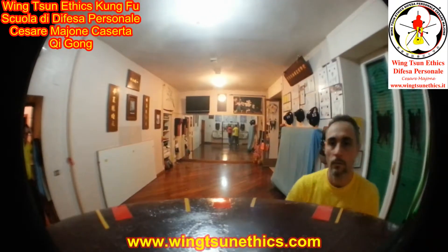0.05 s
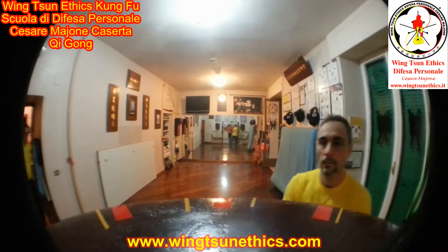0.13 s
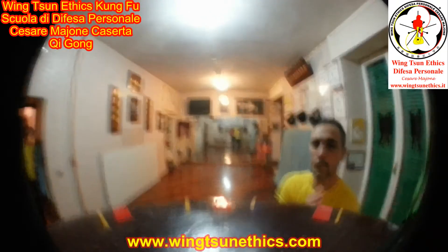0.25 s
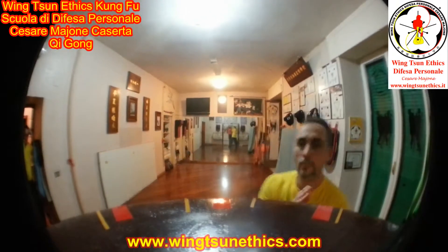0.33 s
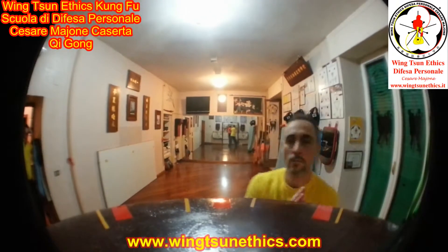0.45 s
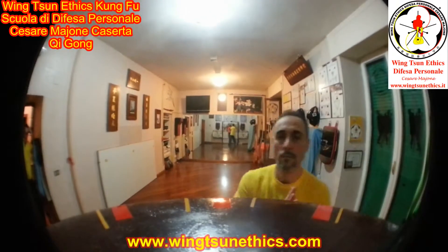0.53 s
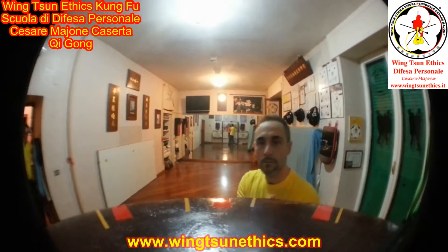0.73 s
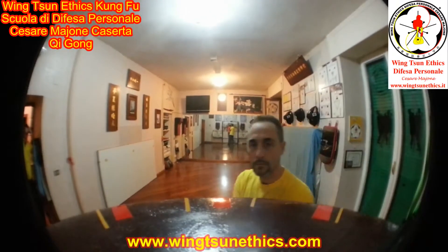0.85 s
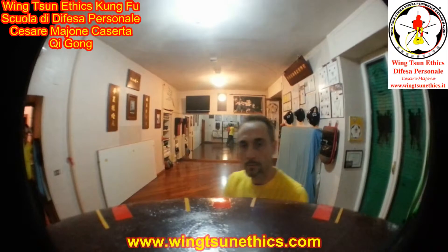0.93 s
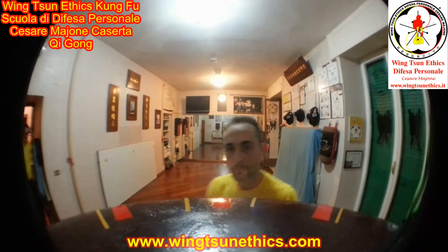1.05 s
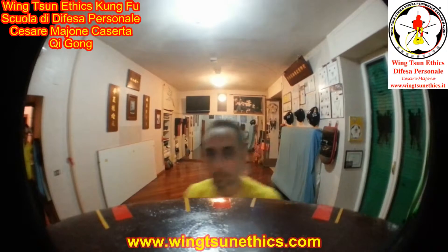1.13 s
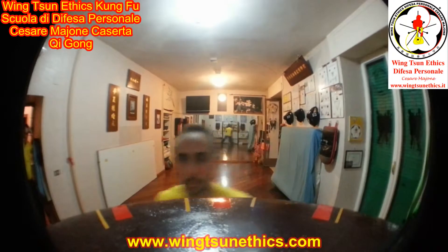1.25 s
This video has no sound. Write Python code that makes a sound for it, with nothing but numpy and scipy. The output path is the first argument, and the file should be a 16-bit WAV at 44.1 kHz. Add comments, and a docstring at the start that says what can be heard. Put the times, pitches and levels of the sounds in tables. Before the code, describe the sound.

The tail of an earlier wooden blow dies away, then one sharp, clipped knock bursts out close by. The hall rings, the loose arm clicks lightly, and shoes scuff quietly near the end; the right side is muffled.

```python
"""Forearm blow on a wooden dummy

A forearm strikes a wooden training dummy close to two microphones, the right one muffled, in a long
hard-walled hall. Damped modes and noise cracks form a tick, the main blow, a burst and a rattle; the blow
overloads the input. Dense echoes answer from the far end and ring on until an expander shuts them.
An earlier blow is dying away at the start. Noise bursts make two shoe scuffs, the far wall's echo of the
second and the clicks of the loose arm; dying sines make low tones that swell briefly, and soft thuds.
Steady coloured noise is the room hush.
"""
import sys
import numpy as np
from scipy import signal
from scipy.fft import rfft, irfft, next_fast_len
from scipy.io import wavfile
from scipy.ndimage import uniform_filter1d

SR = 44100
rng = np.random.default_rng(int(sys.argv[2]) if len(sys.argv) > 2 else 0)


def volts(x):
    """Linear amplitude factor 10**(x/20) for a level x in dB, scalar or array-like."""
    e = np.asarray(x, float) / 20
    return 10 ** e


def to_wav(sig):
    """Store sig (one row per channel, or 1-D mono) as 16-bit WAV at the path in sys.argv[1].

    Samples outside -1..1 are clipped; the rate is SR.
    """
    pcm = np.clip(np.atleast_2d(sig), -1, 1) * 32767
    pcm = np.round(pcm).astype(np.int16)
    wavfile.write(sys.argv[1], SR, pcm.T)  # frames by channels


N = 57330
LEAD_S = 0.7  # computed ahead of time zero, so that the earlier blow is already dying away
SIZE = N + round(LEAD_S * SR)

# contacts with the wood: an earlier blow, then tick, main blow, burst and rattle:
# (time [s], ring level [dB], crack level [dB], crack T60 [s])
WOOD_CONTACTS = [(-.45, 0, 5, 0.024), (.2455, -16.5, -7, 0.0093), (0.2489, 10.5, 0, 0.069),
                 (0.2538, -7, 7, 0.01), (.2735, -15.5, -5.5, 0.025)]
# muffling of the right microphone for hall sound and shoe: (frequency [Hz], left minus right [dB])
HALL_MUFFLING = [(60, 4), (110, -6.5), (200, 6), (380, 2.5), (700, 9), (1290, 12.5), (2380, 26), (4400, 38),
                 (8120, 30.5), (15000, -8)]


def read(points, hz):
    """Interpolates a table linearly along a logarithmic frequency axis."""
    f, value = np.transpose(points)
    return np.interp(np.log(hz + 1), np.log(f + 1), value)


def colour(x, points, sign=1):
    """Minimum-phase filter: folding the cepstrum of a (frequency [Hz], level [dB]) curve makes it causal."""
    size = 2 * next_fast_len(x.shape[-1] // 2 + 4096)
    level_db = sign * read(points, np.fft.rfftfreq(size, 1 / SR))
    cepstrum = irfft(np.log(volts(level_db)), size)
    cepstrum[1:size // 2] *= 2
    cepstrum[size // 2 + 1:] = 0
    response = np.exp(rfft(cepstrum))
    return irfft(rfft(x, size) * response, size)[..., :x.shape[-1]]


def add(mix, s, sound):
    """Superposition: adds a sound to the mix from time s on."""
    part = mix[..., round((s + LEAD_S) * SR):][..., :sound.shape[-1]]
    part += sound[..., :part.shape[-1]]


def dying(t60, rise):
    """Exponential decay after a soft exponential rise, with its time axis; it ends after 0.25 s."""
    t = np.arange(SR // 4) / SR
    return t, (1 - np.exp(-t / max(rise, 1e-5))) * volts(-60 * t / t60)


def puff(points, db, t60, rise):
    """Broadband transient: coloured noise of unit power under a decaying envelope."""
    t, shape = dying(t60, rise)
    noise = colour(rng.standard_normal(len(t)), points)
    return volts(db) * shape * noise / noise.std()


def stereo_gain(left_db, right_db):
    """Level difference between the channels, as a column of two amplitude factors."""
    return volts(np.array([[left_db], [right_db]]))


def muffled(x, points):
    """Spectral shading of one microphone: left unchanged, right filtered by the level difference."""
    return np.array([x, colour(x, points, -1)])


def room_hush():
    """Stationary background: independent coloured noise at each microphone."""
    # spectrum of the hush: (frequency [Hz], relative level [dB])
    hush_spectrum = [(30, -1), (120, -1), (400, -12), (2000, -13.5), (3500, -17.5), (5300, -21.5),
                     (9000, -27.5), (15000, -34)]
    # right-hand muffling, before the factor 0.9: (frequency [Hz], left minus right [dB])
    hush_muffling = [(200, -1.5), (2000, 8.5), (5000, 8.5), (12000, -3.5)]
    level_db = -55.5  # rms level before the muffling
    hush = colour(rng.standard_normal((2, SIZE)), hush_spectrum)
    right = colour(hush[1], hush_muffling, -0.9)
    return volts(level_db) * np.array([hush[0], right]) / hush.std()


def hall(x):
    """Diffuse reverberation: sparse random echoes, each band with its own decay and channel coherence."""
    # likeness of left and right, limited to 0..1: (frequency [Hz], coherence [1])
    hall_coherence = [(60, .7), (200, 1), (640, 0), (1400, 0.24)]
    # reverberation time: (frequency [Hz], T60 [s])
    hall_decay = [(60, 3.3), (140, 1.11), (260, 1.034), (450, 1.39), (660, 1.268), (850, 0.77),
                  (1200, 0.93), (1830, 0.86), (2600, 0.91), (4000, 0.92), (8000, 1.128), (14000, 1.8)]
    near_walls_db = -13  # early echoes relative to the full field
    far_wall_s, build_s = 0.041, 0.012  # arrival of the far end's answer and its build-up
    size = 2 * SR
    signs = rng.choice([-1., 1.], (2, size))
    echoes = signs * (rng.random((2, size)) < 0.15)
    hz, t, bands = signal.stft(echoes, SR, nperseg=512)
    same = np.clip(read(hall_coherence, hz), 0, 1)[:, None]
    right = same * bands[0] + np.sqrt(1 - same ** 2) * bands[1]
    right = right / volts(read(HALL_MUFFLING, hz))[:, None]
    bands = np.array([bands[0], right]) * volts(-60 * t / read(hall_decay, hz)[:, None])
    tail = signal.istft(bands, SR, nperseg=512)[1][:, :size]
    s = np.arange(size) / SR
    build_up = np.clip((s - far_wall_s) / build_s, 0, 1)
    near = volts(near_walls_db)
    tail = tail * (near + (1 - near) * build_up)
    tail = tail / np.linalg.norm(tail[0])  # unit energy on the left
    return signal.fftconvolve(x[None], tail, axes=1)[:, :len(x)]


def low_tone(db, hz, t60, rise, rough):
    """Damped oscillation: a dying sine whose amplitude slow noise makes uneven."""
    t, shape = dying(t60, rise)
    lumps = uniform_filter1d(rng.standard_normal(len(t)), 300)
    uneven = 1 + rough * lumps / lumps.std()
    return -volts(db) * shape * uneven * np.sin(2 * np.pi * hz * t)


def low_tones():
    """Superposed damped oscillations: low tones that swell briefly, and soft thuds."""
    # (time [s], level [dB], frequency [Hz], T60 [s], rise [s])
    tone_events = [(.0, -41.5, 241.8, 0.71, 0.0017), (.072, -29, 234.4, 0.16, 0.0051),
                   (0.0751, -37, 110, .16, 0.018), (.495, -17, 287, 0.16, 0.012),
                   (.525, -23.5, 653.6, 0.17, 0.011), (.6, -35, 640.7, 0.75, 0.013),
                   (.78, -39.5, 70, 0.25, 0.018)]
    tones = np.zeros(SIZE)
    for s, *settings in tone_events:
        add(tones, s, low_tone(*settings, rough=0.3))
    # a smooth onset at the very end
    add(tones, 1.2932, low_tone(db=-31, hz=225, t60=0.2, rise=0.002, rough=0))
    return tones


def shoe_scuffs():
    """Friction noise: coloured bursts for two scuffs, and the far wall's slower-rising echo of the second."""
    # (time [s], level [dB], T60 [s], rise [s])
    scuff_events = [(1.038, -42.5, 0.23, 0.0079), (1.1226, -37, 0.092, 0.0018), (1.16, -37, 0.188, 0.0171)]
    # spectrum of the scuffs: (frequency [Hz], relative level [dB])
    scuff_spectrum = [(200, -52), (1000, -13), (2500, 0), (3800, -4.5), (5200, 1), (8000, -13.5),
                      (11000, -19), (15000, -32)]
    shoe = np.zeros(SIZE)
    for s, db, t60, rise in scuff_events:
        add(shoe, s, puff(scuff_spectrum, db, t60, rise))
    return shoe


def arm_clicks():
    """Small impacts: dry noise bursts as the loose arm settles, panned by level difference."""
    # (time [s], left level [dB], right level [dB])
    click_events = [(.352, -30, -40.5), (.655, -38.5, -60), (.702, -37, -60.5)]
    # spectrum of the clicks: (frequency [Hz], relative level [dB])
    click_spectrum = [(1500, -16), (4000, 7.5), (9000, 0), (14000, -16.5), (16000, -44)]
    clicks = np.zeros((2, SIZE))
    for s, left_db, right_db in click_events:
        click = puff(click_spectrum, db=0, t60=0.038, rise=0.0005)
        add(clicks, s, stereo_gain(left_db, right_db) * click)
    return clicks


def knock_into_hall():
    """Impulse excitation: each contact is one impulse filtered by the spectrum it sends into the hall."""
    # (frequency [Hz], level [dB])
    knock_spectrum = [(30, -35.5), (72, -17), (97, -18), (140, -12.5), (240, -3.5), (330, -6), (450, -15),
                      (620, -8.5), (690, -5), (730, 6), (780, -3), (900, -2), (1000, -0.5), (1100, -3),
                      (1450, -9.5), (1760, -4), (1825, 1.5), (1900, -5), (2700, -10.5), (3600, -20.5),
                      (5300, -17.5), (6500, -26), (8600, -36), (9600, -55), (15000, -68.5)]
    impulse_db = 32.5  # added to the ring level of each contact
    knocks = np.zeros(SIZE)
    for s, ring_db, _, _ in WOOD_CONTACTS:
        add(knocks, s, volts(np.array([ring_db + impulse_db])))
    return colour(knocks, knock_spectrum)


def crack():
    """Contact noise: a very fast-rising noise burst at each contact, muffled on the right."""
    # spectrum of the crack: (frequency [Hz], relative level [dB])
    crack_spectrum = [(90, -57), (300, -25.5), (560, -11.5), (1000, 0), (2500, 4), (4000, -3), (5300, 1),
                      (8000, -8.5), (12000, -24), (16000, -31)]
    # right-hand muffling of direct sound: (frequency [Hz], left minus right [dB])
    near_muffling = [(60, -1.5), (110, -13.5), (200, 13.5), (380, 16), (700, 5.5), (1290, 6), (2380, 9),
                     (4400, 35.5), (8120, 18.5), (15000, 21)]
    bursts = np.zeros(SIZE)
    for s, _, crack_db, t60 in WOOD_CONTACTS:
        add(bursts, s, puff(crack_spectrum, crack_db, t60, rise=0.00018))
    return muffled(bursts, near_muffling)


def ring():
    """Modal synthesis: damped modes of the dummy at each microphone, cut short together."""
    # modes, levels relative to the contact's ring level, decay before the cut:
    # (frequency [Hz], left level [dB], right level [dB], T60 [s])
    wood_modes = [(69.4, -20.5, -25.5, 0.095), (216, -20, -17.5, 0.057), (282.4, -18, -16.5, 0.053),
                  (565.7, -9, -10.5, 0.043), (728.2, -3.5, -13, .16), (1049, 4.5, -10, 0.021),
                  (1100, -18.5, -28.5, 0.023), (1221, -23, -17, 0.051), (1760, -20.5, -25.5, .1),
                  (2460, -22, -33.5, 0.097), (2740, -21, -39, 0.023)]
    right_late_s = 0.0006
    choke_s, choke_fall_s = 0.024, 0.003  # midpoint and time constant of the cut
    late = np.array([[0], [right_late_s]])
    out = 0
    for hz, left_db, right_db, t60 in wood_modes:
        t, shape = dying(t60, rise=0.001)
        mode = np.sin(2 * np.pi * hz * (t - late))  # the delay shifts phase alone
        out = out + stereo_gain(left_db, right_db) * shape * mode
    return out / (1 + np.exp((t - choke_s) / choke_fall_s))


def ringing_wood():
    """Linear resonator: every contact excites the same modes, scaled by its strength."""
    wood = np.zeros((2, SIZE))
    modes = ring()
    for s, ring_db, _, _ in WOOD_CONTACTS:
        add(wood, s, volts(ring_db) * modes)
    return wood


def scene():
    """Superposition of direct sound, reverberation and background."""
    wood = ringing_wood()
    shoe = shoe_scuffs()
    wood_send_db, shoe_send_db = -15.5, 1
    send = knock_into_hall() + volts(wood_send_db) * wood[0] + volts(shoe_send_db) * shoe
    mix = room_hush() + hall(send) + low_tones()
    mix = mix + muffled(shoe, HALL_MUFFLING) + arm_clicks() + crack() + wood
    return mix[:, -N:]


def expand(x, knee_db):
    """Downward expansion: gain rises at once with sensed power and falls at a limited rate below the knee."""
    sense_s, close_db_per_s = 0.004, 136  # power averaging time, fastest fall of the gain
    slope, depth_db = 7.5, 19.5  # dB of cut per dB below the knee, greatest cut
    start_db = -1.5  # lowest gain at the start
    keep = np.exp(-1 / (sense_s * SR))
    power = signal.lfilter([1 - keep], [1, -keep], (x ** 2).mean(0))
    power_db = 10 * np.log10(power + 1e-12)
    cut_db = np.clip(slope * (knee_db - power_db), 0, depth_db)
    # a running maximum on a rising ramp limits how fast the gain can fall
    fall = np.arange(N) * close_db_per_s / SR
    want_db = np.maximum(fall - cut_db, start_db)
    return x * volts(np.maximum.accumulate(want_db) - fall)


def top_cut(x):
    """Nothing passes above the cut-off."""
    return signal.sosfilt(signal.butter(12, 15630, fs=SR, output="sos"), x)


def record(dry):
    """Input chain: low cut, two-band expansion, hard clipping at overload and band limiting."""
    low_cut_hz, split_hz, edge_hz = 60, 900, 15200
    ceiling = 0.97  # of full scale
    dry = signal.lfilter(*signal.butter(2, low_cut_hz, "high", fs=SR), dry)
    low = signal.lfilter(*signal.butter(1, split_hz, fs=SR), dry)
    expanded = expand(low, knee_db=-40) + expand(dry - low, knee_db=-47)
    clipped = np.clip(expanded, -ceiling, ceiling)
    limited = signal.oaconvolve(clipped, signal.firwin(127, edge_hz, fs=SR)[None], "same")
    finished = np.clip(limited, -1, 1)
    return top_cut(finished)


dry = scene()
out = record(dry)
to_wav(out)
```